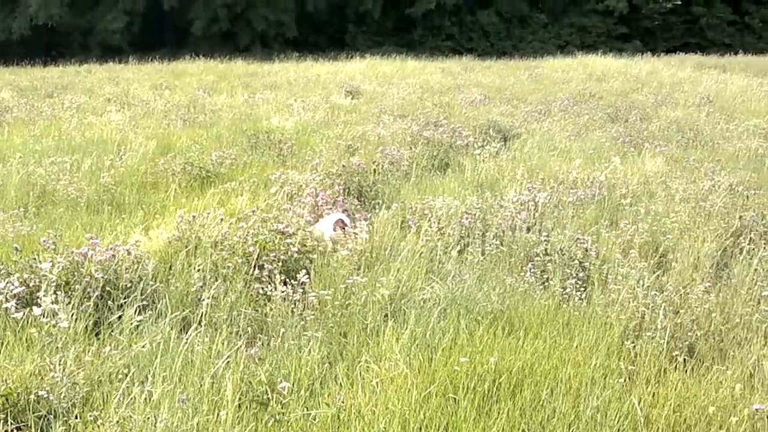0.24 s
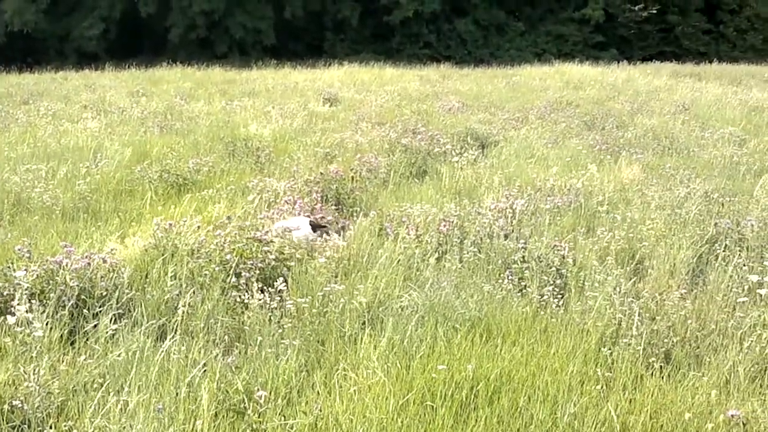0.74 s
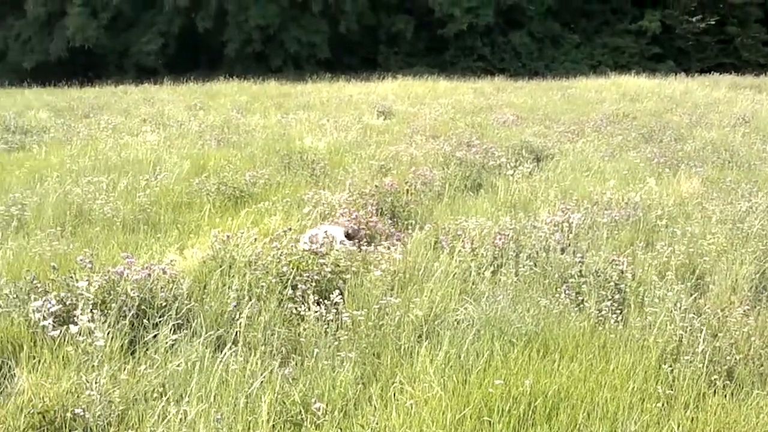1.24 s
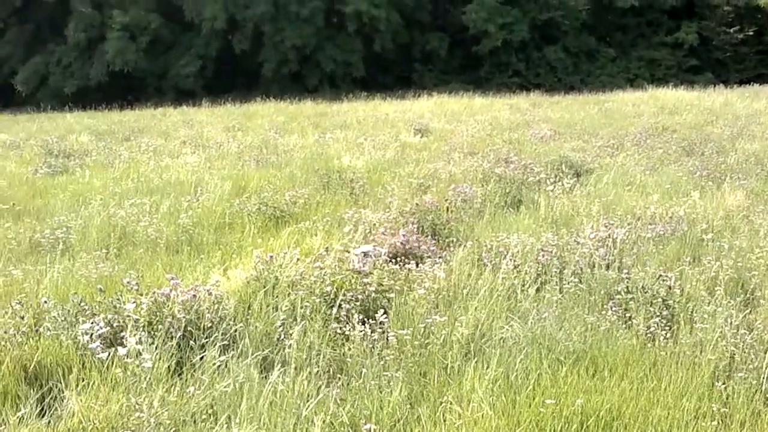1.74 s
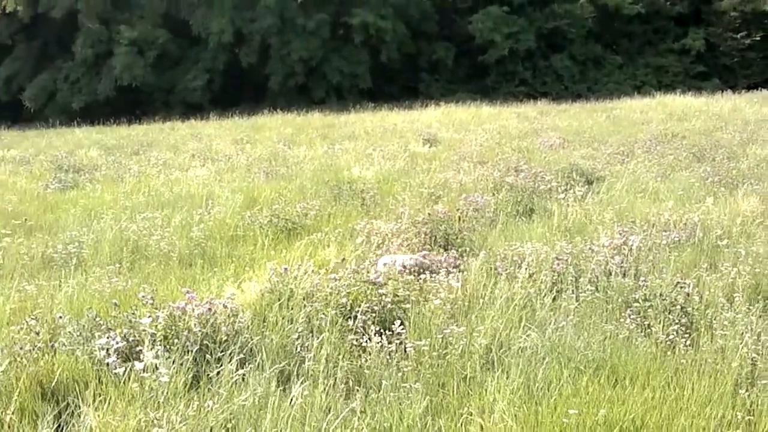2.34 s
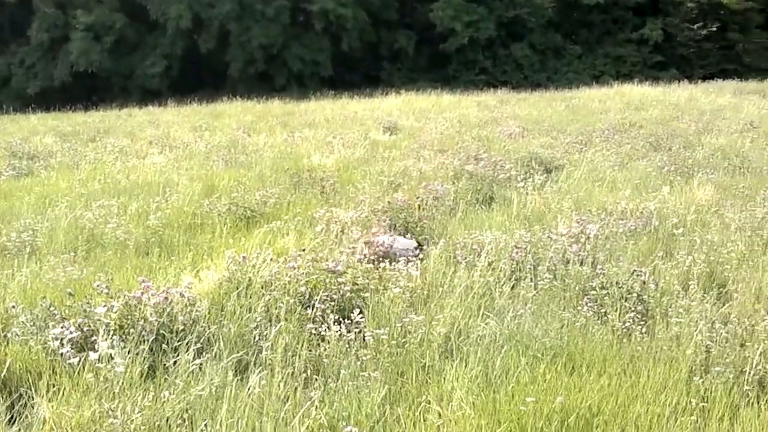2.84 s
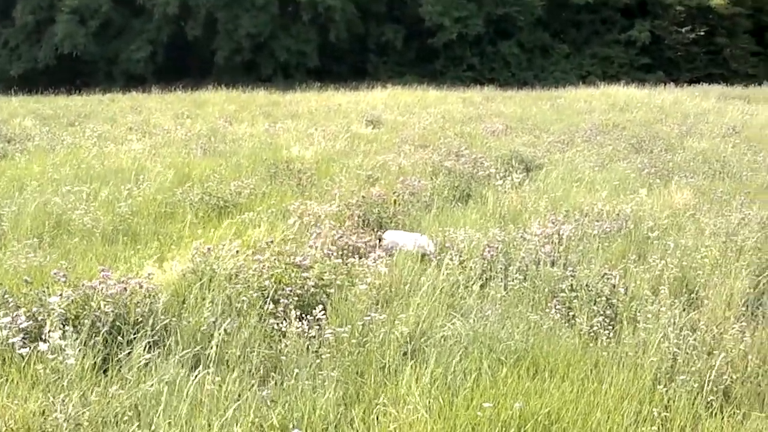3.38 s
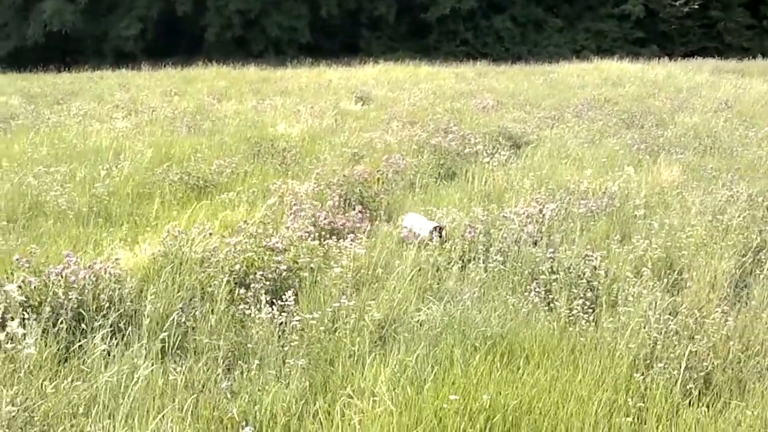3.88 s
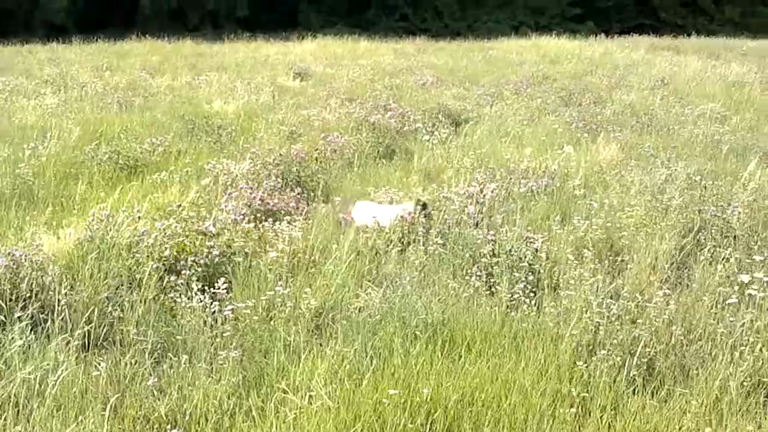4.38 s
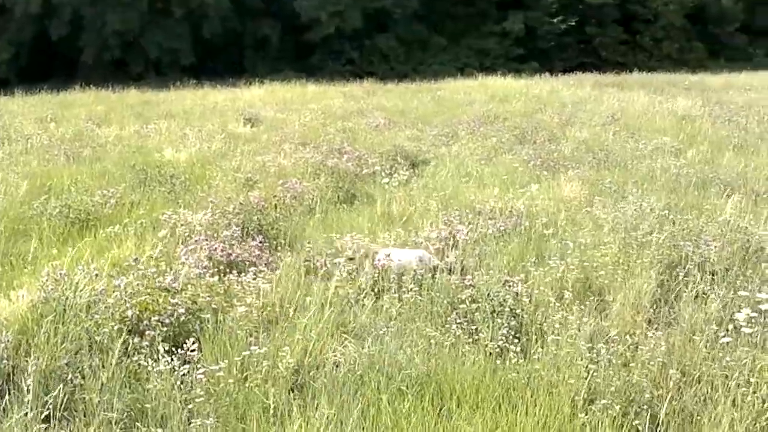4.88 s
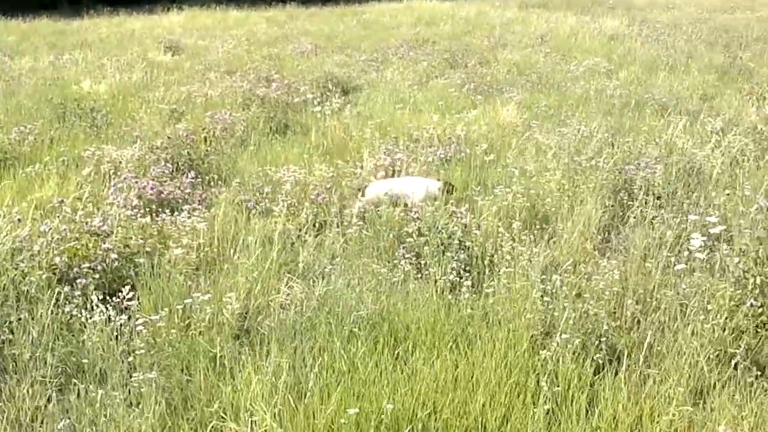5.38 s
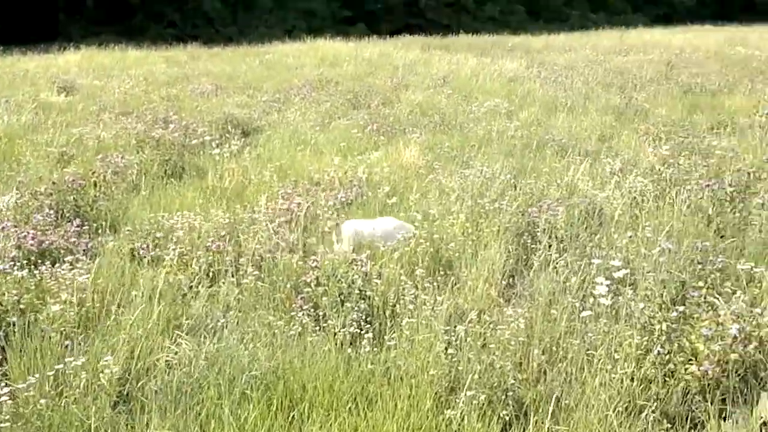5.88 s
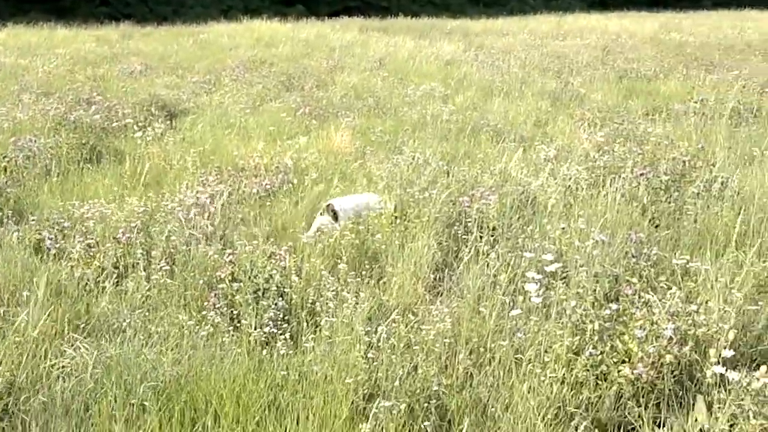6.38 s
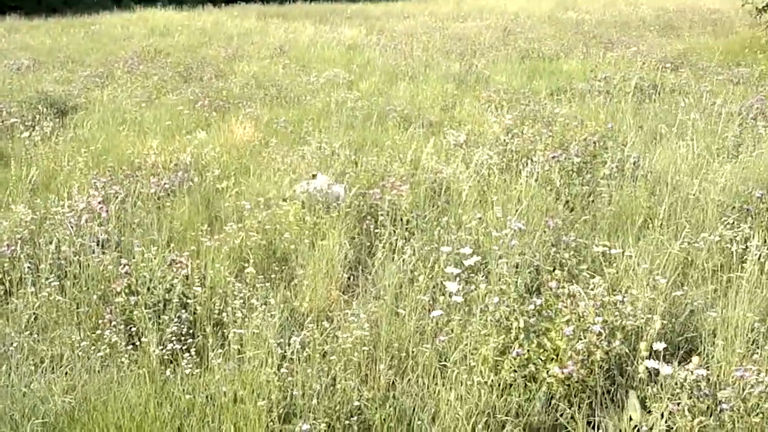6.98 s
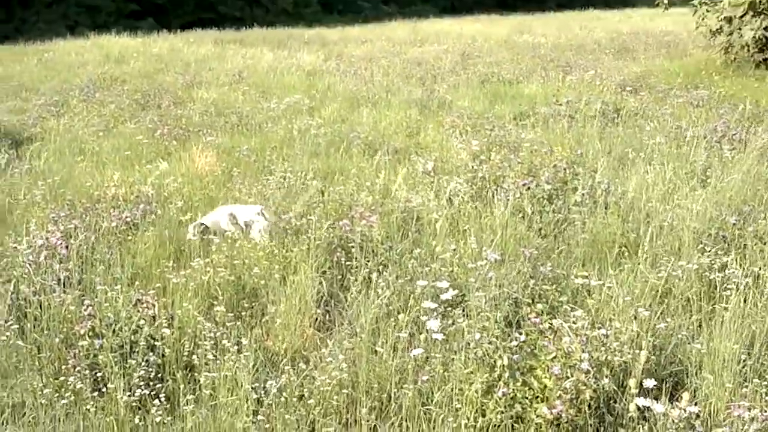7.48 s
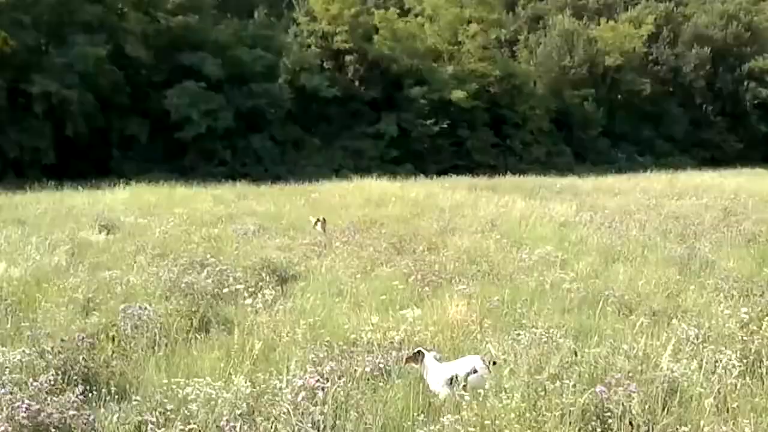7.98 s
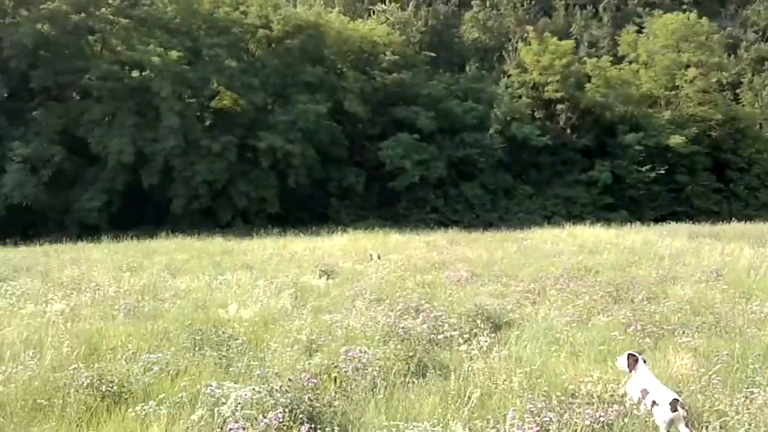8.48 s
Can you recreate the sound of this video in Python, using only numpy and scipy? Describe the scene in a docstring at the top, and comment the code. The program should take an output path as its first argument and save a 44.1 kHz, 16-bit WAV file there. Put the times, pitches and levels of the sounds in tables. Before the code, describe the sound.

Continuous rasping cicadas fill a sunny field, with one nearer insect throbbing above them. Brisk sliding bird whistles open the scene, pause, then return weaker with a light echo from the trees. Grass swishes, stems tick and dull footfalls follow. Near the end come a hard dry crack, gritty scuffs, and a rapid wing clatter with rough squeaks. Light air bumps the close, handheld microphone.

```python
"""Cicadas throb in the trees of a summer meadow and a warbler whistles from the edge of the wood.
A dog and a walker push through tall dry grass; a stalk snaps, a boot scuffs, and a flushed bird
clatters off squeaking near the end. Light air nudges the microphone. Cicadas are clicks and noise
shaped by resonances, birds are gliding tones, grass is crackling noise, and blows are fading tones."""
import sys
import numpy as np
from scipy import signal
from scipy.fft import rfft, irfft, next_fast_len
from scipy.io import wavfile
from scipy.ndimage import uniform_filter1d, map_coordinates

SR = 44100
rng = np.random.default_rng(int(sys.argv[2]) if len(sys.argv) > 2 else 0)


def pcm_store(signal):
    """Save signal as 16-bit PCM."""
    levels = np.round(np.clip(np.atleast_2d(signal), -1, 1) * 32767)
    wavfile.write(sys.argv[1], SR, levels.astype(np.int16).T)


N = 384993

# In all tables, levels are those before the small trims and random swings in the functions.
# In all spectra, only the differences between the levels count.

# Slow drift of the cicada chorus, with a brief dip near 7 s. Each row: time in seconds, level in dB.
CHORUS_LEVEL = [(0, -46.5), (2.4, -47), (3.8, -47), (4.45, -47), (4.7, -44.5), (5.35, -45.5), (6.25, -44),
                (6.73, -45), (6.87, -50.5), (7.0, -51.5), (7.06, -45), (7.3, -46), (8.3, -45.5),
                (8.73, -48)]
# Slow drift of the lower, far buzz. Each row: time in seconds, level in dB.
FAR_BUZZ_LEVEL = [(0, -58.7), (2.3, -58.5), (4.4, -57), (6.7, -55), (7.08, -51.5), (7.3, -58), (7.7, -54),
                  (8.2, -58), (8.73, -55)]
# Spectrum of cicada song. Each row: frequency in Hz, level in dB per Hz.
CICADA_SPECTRUM = [(2000, -42), (3400, -19.5), (3780, -10.5), (4200, -3.5), (5060, -1), (5590, -4.5),
                   (5950, -9), (6900, -10), (7910, -16.5), (8520, -29), (15000, -62)]
# Spectrum of the far buzz. Each row: frequency in Hz, level in dB per Hz.
BUZZ_SPECTRUM = [(1300, -41), (1650, -19), (1850, -6.5), (2050, -1.5), (2350, -1), (2900, -0.5),
                 (3400, -5.5), (4000, -19.5), (5000, -46)]

# Warbler notes. Each row: start in seconds, length in seconds, first pitch in Hz, last pitch in Hz,
# extra pitch in the middle in Hz, level in dB.
WARBLER_NOTES = [(0, 0.043, 4020, 3680, -110, -45.5), (0.104, 0.051, 3400, 3110, -5, -51.5),
                 (0.108, .125, 3694, 3190, -150, -43.5), (0.272, 0.061, 2973, 2800, -43, -38.5),
                 (0.499, 0.061, 2300, 2960, -43, -44.5), (0.557, 0.13, 3120, 2866, -81, -39.5),
                 (0.73, .1, 3640, 3730, -110, -42), (0.852, 0.07, 3100, 2760, 194, -40),
                 (1.022, 0.045, 2600, 2960, 40, -42), (1.046, 0.109, 2902, 3114, -110, -38.5),
                 (2.582, 0.085, 2650, 2990, 35.5, -49), (2.819, 0.054, 3250, 3150, 60, -50.5),
                 (2.986, 0.065, 3480, 2820, 16, -49.5), (3.147, 0.12, 2950, 2490, -71, -48.5),
                 (3.418, .09, 3100, 3150, 60, -49.5), (3.497, 0.061, 3120, 2780, -40, -47),
                 (3.617, 0.081, 2430, 2640, 139, -52), (3.773, 0.079, 3510, 3350, -130, -47),
                 (3.976, 0.068, 3560, 3280, 278, -54), (4.03, .092, 2830, 2970, -55, -49.5),
                 (4.205, 0.065, 3620, 3544, -92, -43.5), (4.364, 0.11, 3280, 2380, -130, -50.5),
                 (5.971, 0.038, 3420, 3280, 0, -49.5), (6.378, 0.047, 3480, 2860, -33, -45),
                 (6.478, 0.056, 3430, 3060, 30, -44.5), (6.576, 0.077, 2844, 2840, -2, -48),
                 (7.1, .058, 3490, 3400, -58, -48), (7.172, .04, 3520, 3480, 122, -51),
                 (7.217, 0.074, 3130, 2890, 139, -46), (7.392, 0.14, 2925, 3197, -83, -45.5),
                 (7.575, 0.073, 3550, 3090, 126, -47), (7.997, 0.086, 3670, 3400, -30, -48.5),
                 (8.036, 0.059, 3140, 2940, 60, -50), (8.214, 0.095, 3060, 3100, -74, -45.5),
                 (8.375, 0.054, 3570, 3570, -28, -47), (8.423, 0.047, 3380, 2970, -160, -48.5),
                 (8.575, 0.097, 3050, 3120, -84, -46.5)]
# The fainter a note, the farther and the more broken it is
CLEAR_DB, CLEAR_ROUGH, ROUGH_PER_DB = -40.5, 0.24, 0.04
# A whistle weakens as it slides below the throat's resonance
THROAT_HZ, THROAT_DB_PER_OCTAVE = 2900, 31
# Echo of the trees. Each row: frequency in Hz, time to fade by 60 dB in seconds.
TREE_ECHO = [(500, 0.11), (3000, 0.24), (10000, 0.23)]

# Nudges of air and hand on the microphone. Each row: centre in seconds, rumble in dB, thud in dB.
MICROPHONE_NUDGES = [(.65, -66, -65.5), (1.26, -61, -71), (2.33, -64, -65.5), (3.23, -67, -68),
                     (4.13, -62, -70), (4.76, -55, -55.5), (4.91, -46.5, -61.5), (5.06, -54, -57.5),
                     (5.18, -45, -57.5), (5.28, -53, -63), (6.31, -56.5, -64), (6.66, -63, -68),
                     (7.01, -57, -58.5), (7.12, -61, -56), (7.68, -77, -57.5), (7.779, -62, -48),
                     (7.96, -61, -49.5), (8.06, -57, -54), (8.18, -57, -61), (8.3, -66, -63.5),
                     (8.44, -77, -65)]
NUDGE_S = 0.031  # spread to each side of the centre
CALM_RUMBLE_DB, CALM_THUD_DB, CALM_SWING_DB = -72.5, -73.5, 2.5  # light air in between; rumble swing
# Spectrum of the rumble. Each row: frequency in Hz, level in dB per Hz.
RUMBLE_SPECTRUM = [(10, 3.5), (22, 1.5), (42, 9.5), (55, -5.5), (80, -23), (200, -53)]
# Spectrum of the thuds. Each row: frequency in Hz, level in dB per Hz.
THUD_SPECTRUM = [(30, -21), (55, -0.5), (70, 0.5), (95, -4), (130, -5.5), (200, -11.5), (350, -20.5),
                 (700, -59)]
# Spectrum of the hush of open country. Each row: frequency in Hz, level in dB per Hz.
AIR_SPECTRUM = [(60, -6), (150, -1.5), (300, 0), (600, -3.5), (1200, -4.5), (2000, -11), (8000, -21),
                (12000, -20.5), (15000, -27)]

# Throbs of the nearest cicada. Each row: centre in seconds, body in dB, bright rasp in dB.
NEAR_THROBS = [(.23, -50, -71), (.52, -47, -66), (.72, -53, -74), (.925, -46, -79), (1.02, -55, -72),
               (1.15, -46, -65), (1.335, -47, -65), (1.5, -56, -72), (1.63, -49.5, -77), (1.74, -54, -74),
               (1.94, -54, -70), (2.14, -50, -68.5), (2.35, -52, -69), (2.82, -50, -86), (3.16, -46.5, -73),
               (3.33, -49.5, -67), (4.38, -48, -75), (4.81, -52, -72), (6.22, -48, -70), (6.4, -45.5, -70),
               (7.6, -51, -68), (7.8, -52, -56.5), (7.95, -45.5, -65)]
THROB_S = 0.027  # spread to each side of the centre
# Spectrum of the bright rasp. Each row: frequency in Hz, level in dB per Hz.
RASP_SPECTRUM = [(3500, -40), (4800, -3), (6000, 5.5), (7700, 6.5), (9000, 1.5), (11000, -7.5),
                 (13000, -61)]

# Strokes through the grass. Each row: start in seconds, length of the hold in seconds,
# swish of blades in dB, crush of stems in dB.
GRASS_STROKES = [(2.74, 0.34, -64.5, -84), (3.19, 0.076, -56, -71), (3.333, 0.11, -61.5, -84),
                 (3.502, 0.32, -66, -87), (3.854, 0.16, -75, -69.5), (4.05, 0.059, -58.5, -73.5),
                 (4.205, 0.28, -54.5, -68.5), (4.557, 0.054, -50.5, -67), (4.687, 0.19, -52, -67),
                 (4.96, 0.14, -54.5, -65), (5.177, 0.3, -60, -81), (5.466, 0.062, -53.5, -69),
                 (5.528, 0.14, -52.5, -80), (5.778, 0.054, -50, -79), (5.875, 0.22, -52, -72),
                 (6.223, 0.022, -60, -78.5), (6.43, .15, -56, -67), (6.602, 0.27, -50.5, -66),
                 (6.859, 0.085, -49.5, -58.5), (6.98, 0.11, -53, -60.5), (7.153, 0.015, -51.5, -58),
                 (7.634, 0.24, -71, -58.5), (7.815, 0.018, -70, -61), (7.963, 0.017, -67.5, -50),
                 (8.132, 0.095, -58, -65), (8.302, 0.46, -79.5, -77.5)]
# Blades bend, press hardest midway, then spring back
STROKE_ATTACK_S, STROKE_RELEASE_S, STROKE_ARCH_DB = 0.052, 0.028, 1.5
# Spectrum of brushing blades. Each row: frequency in Hz, level in dB per Hz.
SWISH_SPECTRUM = [(1200, -25), (2200, 3.5), (3500, 2), (6500, 6), (8500, 5.5), (11000, 0), (14000, -7.5),
                  (16000, -10.5)]
# Spectrum of crushed stems. Each row: frequency in Hz, level in dB per Hz.
CRUSH_SPECTRUM = [(100, -4), (250, -6), (420, -1), (600, -2.5), (850, 3.5), (1200, 3), (1700, 5.5),
                  (2500, -5.5), (4000, -17), (8000, -50), (12000, -57)]

# Dry seed heads shaken by the legs. Each row: centre in seconds, spread to each side in seconds,
# level in dB.
SEED_SHAKES = [(3.26, .018, -67), (4.35, 0.11, -58), (4.59, .02, -62), (4.8, 0.053, -57),
               (6.797, 0.19, -51.5), (7.976, .02, -68), (8.191, 0.032, -50)]
# Spectrum of the seeds. Each row: frequency in Hz, level in dB per Hz.
SEED_SPECTRUM = [(8000, -24), (10500, -18), (12500, -3), (14000, 4), (15700, -2.5)]

# Single stems ticking. Each row: start in seconds, peak in dB, main pitch in Hz.
STEM_TICKS = [(3.825, -48, 2100), (4.218, -42, 1900), (4.604, -41.5, 1560), (4.793, -46, 1020),
              (5.019, -53, 1060), (5.938, -56, 2000), (6.06, -37.5, 1870), (6.489, -53, 1950)]

# Soft footfalls on the turf. Each row: centre in seconds, level in dB.
FOOTFALL_TIMES = [(4.81, -58.5), (5.05, -68), (5.5, -64.5), (5.83, -68), (5.95, -64), (6.07, -65.5),
                  (6.9, -53), (7.155, -53.5), (8.21, -56)]
FOOTFALL_S = 0.014  # spread to each side of the centre
# Spectrum of a footfall. Each row: frequency in Hz, level in dB per Hz.
TURF_SPECTRUM = [(100, -18), (220, -3), (400, 0.5), (600, -4.5), (1000, -3), (2500, -36)]

# A dry stalk breaks: start in seconds, peak in dB.
STALK_SNAP = (6.9715, -13)
# Tones of the breaking stalk. Each row: frequency in Hz, level in dB, time to fade by 60 dB in seconds.
STALK_TONES = [(1890, -18, .005), (2830, -26, .005), (5540, -14, 0.0058), (8100, 8, 0.0013),
               (10740, -4, 0.0031), (12160, -1.5, 0.0036), (13800, -7, 0.002)]

# From DULL_S on, the cicadas lose a share of their treble
DULL_S, DULL_FADE_S, DULL_HZ, DULL_SHARE = 7.1, .15, 6560, 0.49

# Boot scuffs. Each row: centre in seconds, spread to each side in seconds, level in dB.
BOOT_SCUFFS = [(7.163, 0.024, -38), (7.275, 0.037, -41.5)]
# Spectrum of the scuffing sole. Each row: frequency in Hz, level in dB per Hz.
SOLE_SPECTRUM = [(120, -17), (300, -15.5), (550, -10.5), (700, -6), (830, 1), (960, 1.5), (1150, -10),
                 (1500, -8), (2300, -10), (5000, -19), (9000, -57)]

# Swells of a thin, very high hiss. Each row: centre in seconds, spread to each side in seconds,
# level in dB.
HISS_SWELLS = [(7.43, 0.08, -66.5), (7.715, 0.081, -60)]
# Spectrum of the hiss. Each row: frequency in Hz, level in dB per Hz.
HISS_SPECTRUM = [(11500, -40), (12800, -15), (14000, 0), (15700, -5)]

# Wing claps. Each row: time in seconds (each part starts about 1 ms later), peak of the main part in dB.
WING_CLAPS = [(7.627, -36), (7.746, -33.5), (7.79, -33), (7.835, -35), (7.881, -31.5), (7.931, -15.5),
              (7.958, -42), (7.978, -31), (8.021, -40), (8.064, -41), (8.296, -47.5), (8.484, -43.5)]
# Main tones of a clap. Each row: frequency in Hz, level in dB, time to fade by 60 dB in seconds.
WING_TONES = [(826, -9, 0.013), (1620, 1, 0.01), (2040, 1, 0.0073)]
# Bright part of a hard clap. Each row: frequency in Hz, level in dB, time to fade by 60 dB in seconds.
SLAP_TONES = [(2240, -3, 0.0059), (3280, -4.5, 0.0063), (5470, -6, 0.0026)]

# Squeaks of the flushed bird. Each row: start in seconds, length in seconds, first pitch in Hz,
# last pitch in Hz, extra pitch in the middle in Hz, level in dB.
BIRD_SQUEAKS = [(7.902, .043, 1806, 1990, 51, -44.5), (7.949, 0.044, 2330, 2495, -110, -38.5),
                (7.986, .025, 2610, 2920, 40, -46), (8.019, .013, 2660, 2790, 40, -36),
                (8.501, .05, 2000, 1550, 62, -48), (8.568, 0.018, 2210, 2300, -170, -41.5)]
SQUEAK_ROUGH = 0.79

TOP_HZ = 15750  # nothing above this is kept


def amp(db):
    """Turn decibels into gain."""
    return 10 ** (np.asarray(db) / 20)


def unit(x):
    """Scale to an average strength (rms) of 1."""
    return x / np.sqrt(np.mean(x ** 2) + 1e-20)


def clock():
    """Give the time of each sample in seconds."""
    return np.arange(N) / SR


def along(points, hz):
    """Read a value between (Hz, value) points on a log pitch axis."""
    f, v = np.transpose(points)
    return np.interp(np.log(hz + 1), np.log(f + 1), v)


def curves(rows):
    """Draw one curve over time for each column after the time."""
    s, *cols = np.transpose(rows)
    return [np.interp(clock(), s, c) for c in cols]


def wobble(rate):
    """Draw a smooth random curve through `rate` random points a second."""
    points = rng.standard_normal(int(N * rate / SR) + 4)
    return map_coordinates(points, [clock() * rate])


def filtered(x, response):
    """Multiply each frequency of x by a response."""
    size = next_fast_len(N + 8192)
    hz = np.fft.rfftfreq(size, 1 / SR)
    return irfft(rfft(x, size) * response(hz), size)[:N]


def coloured(x, spectrum):
    """Shape x by a spectrum, then scale to rms 1."""
    return unit(filtered(x, lambda hz: amp(along(spectrum, hz))))


def treble(x, edge_hz):
    """Keep what lies above a soft edge."""
    return filtered(x, lambda hz: 1 / (1 + (edge_hz / (hz + 1)) ** 12))


def noise():
    """Make white noise: all frequencies equally strong."""
    return rng.standard_normal(N)


def crackle(per_second, share):
    """Mix tiny random contacts, a given share of the power, with a bed of noise."""
    ticks = noise() * (rng.random(N) < per_second / SR)
    return np.sqrt(share) * unit(ticks) + np.sqrt(1 - share) * noise()


def patchy(x, depth_db):
    """Vary the strength at random over small patches of time and pitch."""
    z = signal.stft(x, nperseg=512)[2]
    field = uniform_filter1d(rng.standard_normal(z.shape), size=5, axis=0)
    field = uniform_filter1d(field, size=6, axis=1)
    return signal.istft(z * amp(depth_db * unit(field)), nperseg=512)[1][:N]


def swell(s, spread):
    """Rise and fall smoothly, as a bell curve around time s."""
    return np.exp(-.5 * np.minimum(((clock() - s) / spread) ** 2, 200))


def swells(rows):
    """Add up swells given as rows of centre, spread and level."""
    return sum(amp(db) * swell(s, spread) for s, spread, db in rows)


def together(shapes, *levels_db):
    """Join events by adding their power: one envelope for each column of levels."""
    power = np.square(shapes)
    return [np.sqrt(amp(db) ** 2 @ power) for db in levels_db]


def add(track, s, sound):
    """Mix a sound into the track at time s."""
    part = track[max(round(s * SR), 0):][:len(sound)]
    part += sound[:len(part)]


def knock(modes, attack, scatter):
    """A short blow sets off fading tones, slightly random in pitch and level; the peak is 1."""
    t = np.arange(SR // 20) / SR
    ring = np.zeros(len(t))
    for k, (hz, db, t60) in enumerate(modes):
        fade = amp(db + rng.normal(0, 1) - 60 * t / t60)
        tone = np.sin(2 * np.pi * hz * (1 + scatter * rng.normal()) * t)
        ring += fade * tone * (-1) ** k  # every other tone is flipped
    ring = ring * (1 - np.exp(-t / attack))
    return ring / np.abs(ring).max()


def tymbal(click_hz, jitter):
    """A cicada's ribs buckle one by one, clicking at a slightly uneven rate."""
    turns = np.cumsum(click_hz * (1 + jitter * wobble(60))) / SR
    return unit(np.diff(np.floor(turns), prepend=0))


def chorus(count=10):
    """Each cicada clicks into its own body resonance in throbs; noise is the wash of the far ones."""
    level_db, = curves(CHORUS_LEVEL)
    insects = np.zeros(N)
    for body_hz, pace in zip(np.linspace(4400, 5500, count), rng.normal(0, .15, count)):
        throb = np.sin(2 * np.pi * (5.8 * (1 + pace) * clock() + 0.48 * wobble(2)))
        clicks = tymbal(click_hz=330 * np.exp(pace), jitter=.28) * amp(5.7 * throb)
        insects += unit(filtered(clicks, lambda hz: 1 / (1 + 1j * (hz - body_hz) / 400)))
    wash = amp(5.5) * noise()
    return amp(level_db + 0.62) * coloured(unit(insects) + wash, CICADA_SPECTRUM)


def far_buzz():
    """Many far clicks blur into a lower, patchy crackle that flutters in strength."""
    level_db, = curves(FAR_BUZZ_LEVEL)
    buzz = coloured(patchy(crackle(per_second=1500, share=0.18), depth_db=2.0), BUZZ_SPECTRUM)
    return amp(level_db + 3.5) * buzz * amp(1.45 * wobble(14))


def whistles(calls):
    """Tones glide along an arch; rough ones quaver in pitch and break up in strength."""
    song, quaver, flutter = np.zeros(N), wobble(300), wobble(110)
    for s, length, first_hz, last_hz, arch_hz, db, rough, slope_db in calls:
        u = np.linspace(0, 1, int(length * SR))  # progress through the note
        here = np.clip(int(s * SR) + np.arange(len(u)), 0, N - 1)
        hz = first_hz + (last_hz - first_hz) * u + arch_hz * (1 - (2 * u - 1) ** 2)
        throat = amp(slope_db * np.minimum(np.log2(hz / THROAT_HZ), 0))
        hz = hz * (1 + .03 * rough * quaver[here])
        rise_and_fall = np.abs(np.sin(np.pi * u)) ** .7
        shape = unit(rise_and_fall * throat * amp(6 * rough * flutter[here]))
        add(song, s, amp(db + 1.0) * shape * np.sin(2 * np.pi * np.cumsum(hz) / SR))
    return song


def warbler():
    """Whistled notes weaken below the throat's resonance, and fainter ones are rougher."""
    calls = []
    for note in WARBLER_NOTES:
        rough = CLEAR_ROUGH + ROUGH_PER_DB * (CLEAR_DB - note[-1])
        calls.append((*note, rough, THROAT_DB_PER_OCTAVE))
    return whistles(calls)


def trees(x):
    """The edge of the wood scatters sound back as a fading blur, made from decaying noise."""
    hz, t, z = signal.stft(rng.standard_normal(SR // 2), SR, nperseg=256)
    fade = amp(-60 * t / along(TREE_ECHO, hz)[:, None])
    tail = signal.istft(z * fade, SR, nperseg=256)[1]
    return signal.fftconvolve(x, tail / np.linalg.norm(tail))[:N]


def breeze():
    """Air puffs and soft handling thuds push on the microphone, over the hush of open country."""
    times, rumble_db, thud_db = np.transpose(MICROPHONE_NUDGES)
    puffs, bumps = together([swell(s, NUDGE_S) for s in times], rumble_db, thud_db)
    calm_rumble = amp(CALM_RUMBLE_DB + CALM_SWING_DB * wobble(3.3))
    calm_thud = amp(CALM_THUD_DB + 1.4 * wobble(30))
    rumble = np.hypot(puffs, calm_rumble) * coloured(noise(), RUMBLE_SPECTRUM)
    thud = np.hypot(bumps, calm_thud) * coloured(noise(), THUD_SPECTRUM)
    return rumble + thud + amp(-74) * coloured(noise(), AIR_SPECTRUM)


def near_cicada():
    """The nearest insect throbs above the chorus: clicks and noise in a body tone and a bright rasp."""
    times, body_db, rasp_db = np.transpose(NEAR_THROBS)
    body, rasp = together([swell(s, THROB_S) for s in times], body_db, rasp_db)
    body_clicks = tymbal(click_hz=289, jitter=0.17) + noise()
    rasp_clicks = tymbal(click_hz=289, jitter=0.17) + noise()
    body_sound = body * coloured(body_clicks, CICADA_SPECTRUM)
    return body_sound + amp(4.5) * rasp * coloured(rasp_clicks, RASP_SPECTRUM)


def stroke(s, length):
    """One push through the grass builds up, presses hardest midway and lets go."""
    t = clock() - s
    outside = np.maximum(-t, 0) / STROKE_ATTACK_S + np.maximum(t - length, 0) / STROKE_RELEASE_S
    arch = np.sin(np.pi * np.clip(t / length, 0, 1)) - 2 / np.pi
    return np.exp(-np.minimum(outside ** 1.16, 20)) * amp(STROKE_ARCH_DB * arch)


def grass():
    """Blades brush past each other in a hiss, while stems crush lower down."""
    times, lengths, swish_db, crush_db = np.transpose(GRASS_STROKES)
    pushes = [stroke(s, length) for s, length in zip(times, lengths)]
    brushing, crushing = together(pushes, swish_db, crush_db)
    blades = coloured(patchy(crackle(per_second=1800, share=0.23), depth_db=2.45), SWISH_SPECTRUM)
    # slow (faint) brushing loses the top of its hiss
    slow = np.clip((-55 - 20 * np.log10(brushing)) / 8, 0, 1)
    blades = blades - slow * treble(blades, edge_hz=12000)
    swish = amp(2.0 + 0.47 * wobble(22)) * brushing * blades
    stems = coloured(patchy(crackle(per_second=400, share=0.4), depth_db=3.0), CRUSH_SPECTRUM)
    return swish + amp(4.5 + 0.81 * wobble(25)) * crushing * stems


def seed_heads():
    """Shaken dry seeds make many tiny contacts, heard as a high fizz."""
    return swells(SEED_SHAKES) * coloured(crackle(per_second=2000, share=0.37), SEED_SPECTRUM)


def stem_ticks():
    """Each struck stem rings briefly at three pitches."""
    out = np.zeros(N)
    for s, db, hz in STEM_TICKS:
        modes = [(hz, 0, .012), (1.43 * hz, -4, .006), (0.59 * hz, -8, .008)]
        add(out, s, amp(db) * knock(modes, attack=0.00068, scatter=.01))
    return out


def footfalls():
    """Feet press on the turf with short, dull crackles."""
    rows = [(s, FOOTFALL_S, db) for s, db in FOOTFALL_TIMES]
    return swells(rows) * coloured(crackle(per_second=500, share=0.27), TURF_SPECTRUM)


def stalk_snap():
    """A breaking stalk lets go suddenly and rings for a few thousandths of a second."""
    out = np.zeros(N)
    s, db = STALK_SNAP
    add(out, s, amp(db) * knock(STALK_TONES, attack=0.00033, scatter=0.012))
    return out


def dulled(x):
    """Part of the treble fades away and stays lower."""
    fade = np.clip((clock() - DULL_S) / DULL_FADE_S, 0, 1)
    return x - DULL_SHARE * fade * treble(x, DULL_HZ)


def boot_scuffs():
    """A sole rubs the ground twice in patchy, crackling noise."""
    sole = coloured(patchy(crackle(per_second=2000, share=0.43), depth_db=2.5), SOLE_SPECTRUM)
    return swells(BOOT_SCUFFS) * sole


def high_hiss():
    """Noise at the very top of the treble swells twice."""
    return swells(HISS_SWELLS) * coloured(noise(), HISS_SPECTRUM)


def wing_claps():
    """The rising bird's wings clap as short ringing blows; harder claps are brighter."""
    out = np.zeros(N)
    for s, db in WING_CLAPS:
        hard = np.clip(amp(db + 15.0), 0, 1)
        add(out, s + 0.00104, amp(db) * knock(WING_TONES, attack=0.0023, scatter=0.026))
        add(out, s + 0.00123, amp(db) * hard * knock(SLAP_TONES, attack=0.00034, scatter=0.015))
    return out


def flushed_bird():
    """Very rough, short gliding whistles make squeaks, with no weakening at low pitch."""
    return whistles([(*squeak, SQUEAK_ROUGH, 0) for squeak in BIRD_SQUEAKS])


def scene():
    """All sources meet at one microphone, with the trees echoing the birds and sharp blows."""
    cicadas = dulled(chorus() + far_buzz() + near_cicada())
    song = warbler() + flushed_bird()
    sharp = stem_ticks() + stalk_snap() + wing_claps()
    echo = trees(amp(-7.5) * song + amp(-19) * sharp)
    ground = grass() + seed_heads() + footfalls() + boot_scuffs()
    return (cicadas + song + sharp + echo + ground + high_hiss() + breeze())[None]


def record(dry):
    """Cut off everything from the band limit upwards."""
    return filtered(dry[0], lambda hz: hz < TOP_HZ)[None]


dry = scene()
out = record(dry)
pcm_store(out)
```